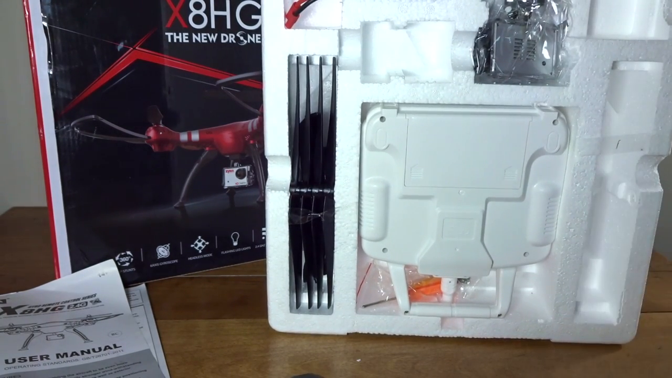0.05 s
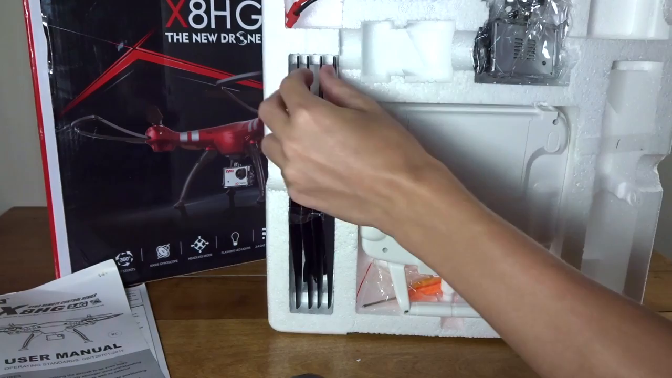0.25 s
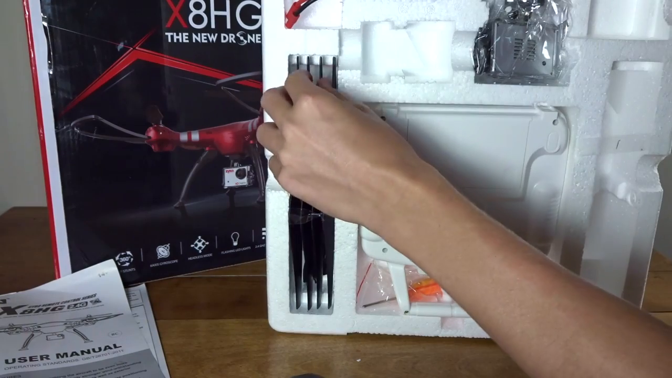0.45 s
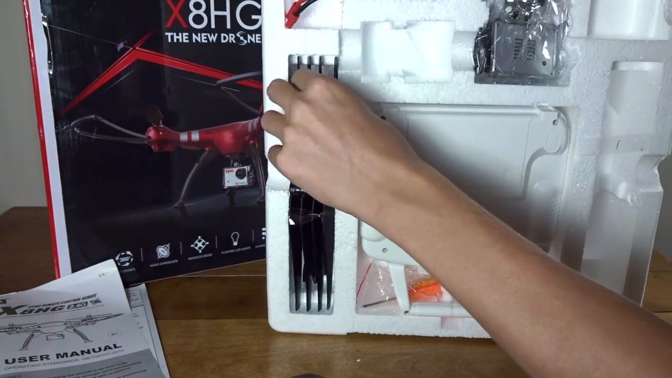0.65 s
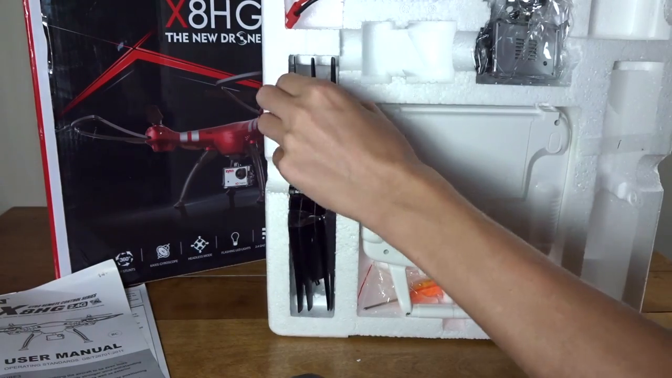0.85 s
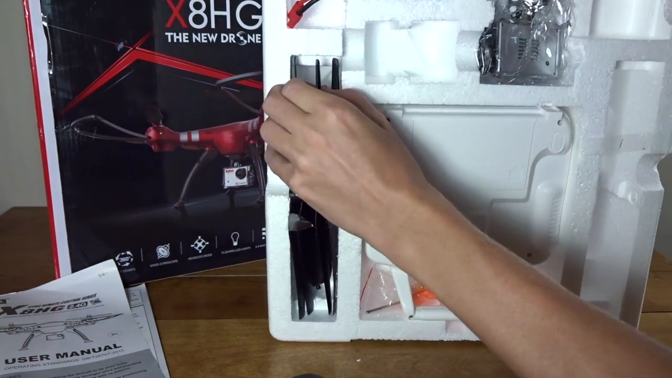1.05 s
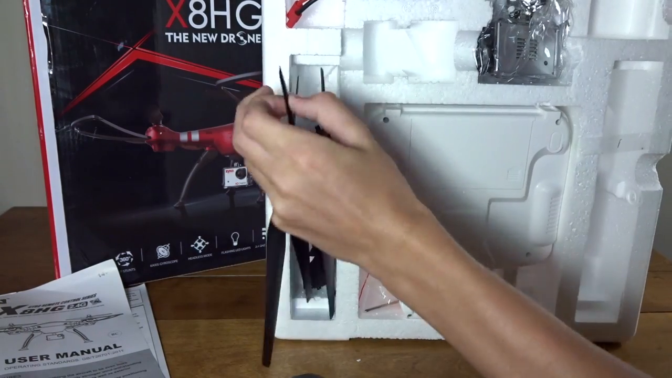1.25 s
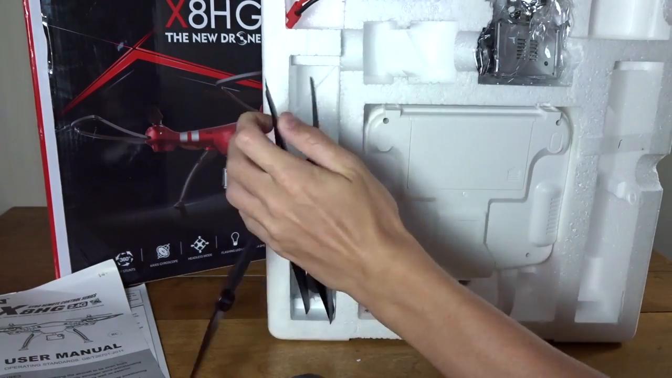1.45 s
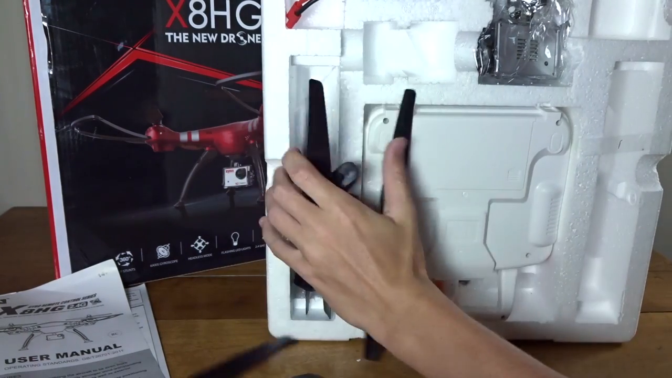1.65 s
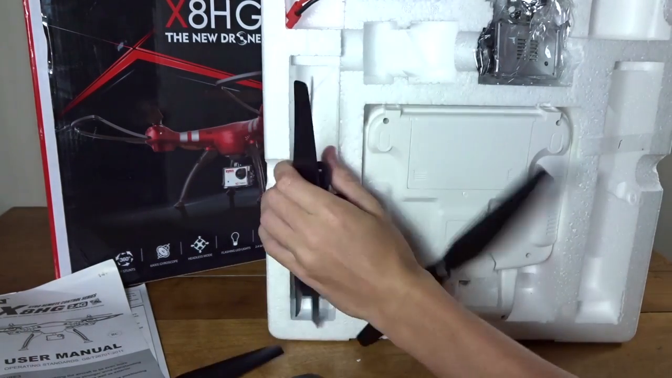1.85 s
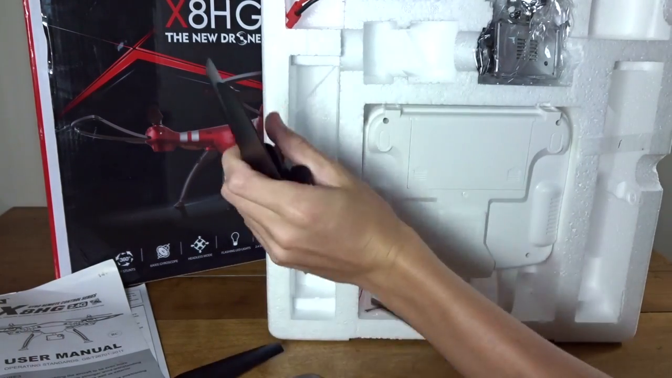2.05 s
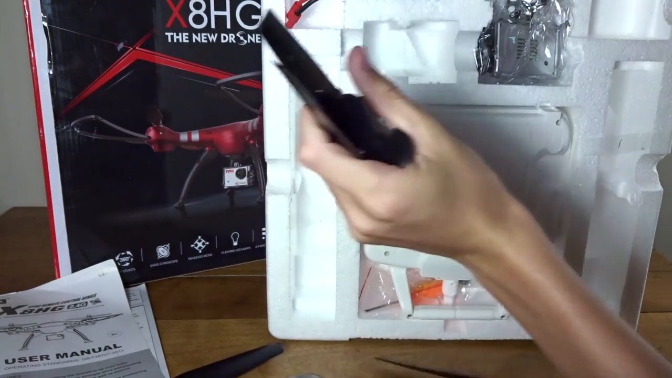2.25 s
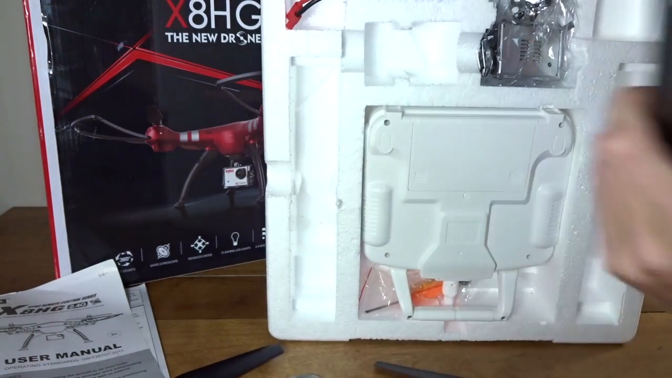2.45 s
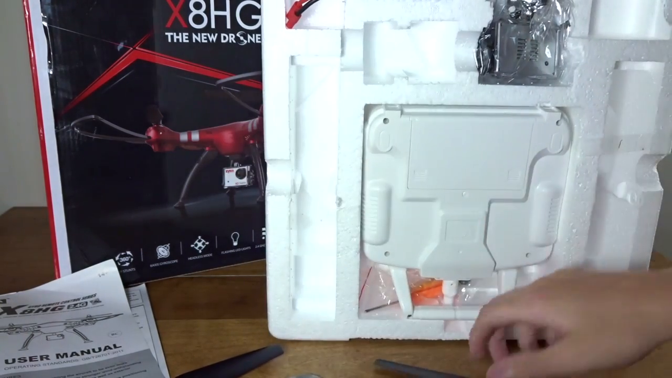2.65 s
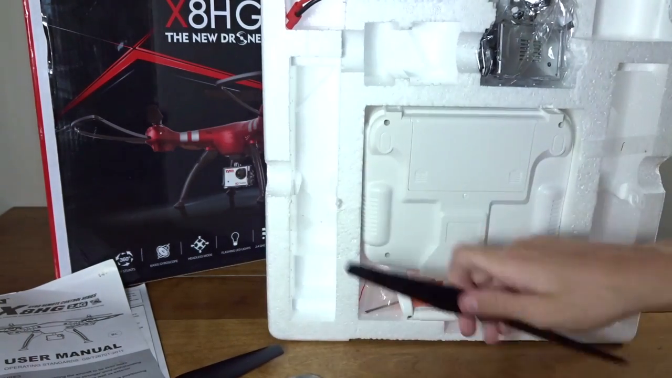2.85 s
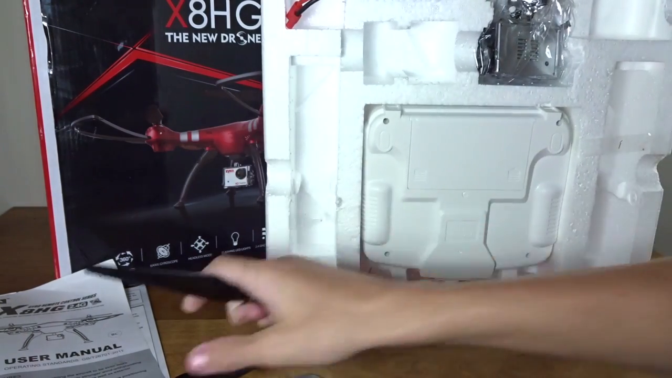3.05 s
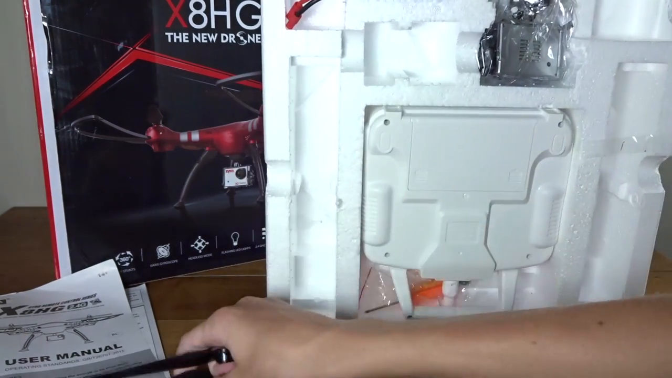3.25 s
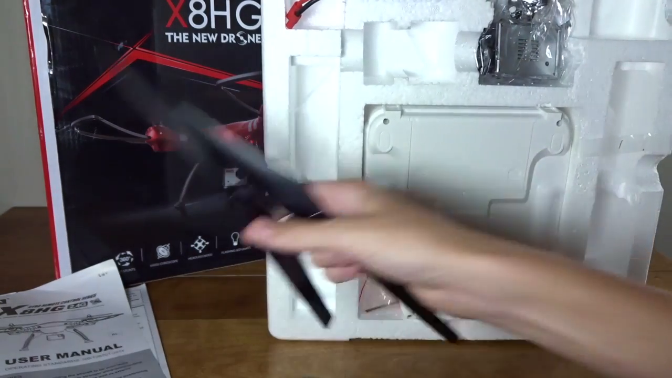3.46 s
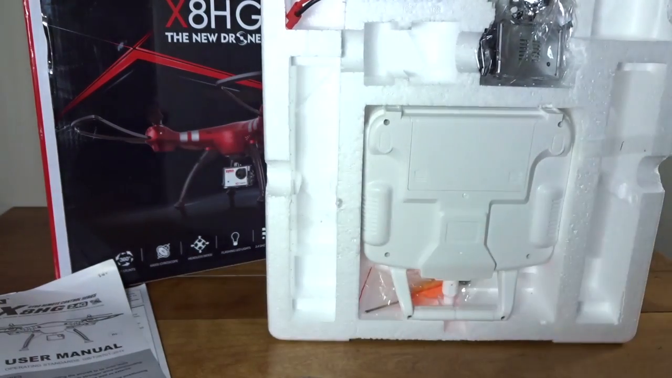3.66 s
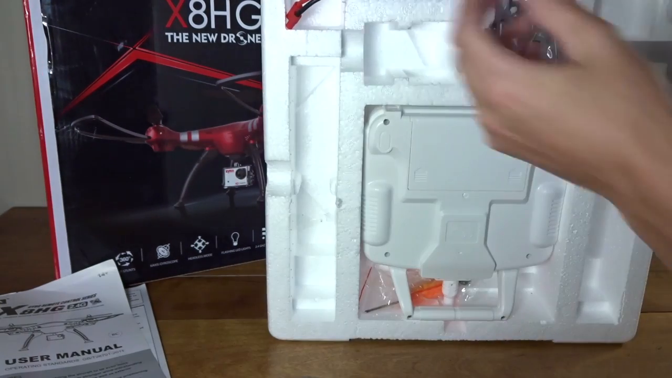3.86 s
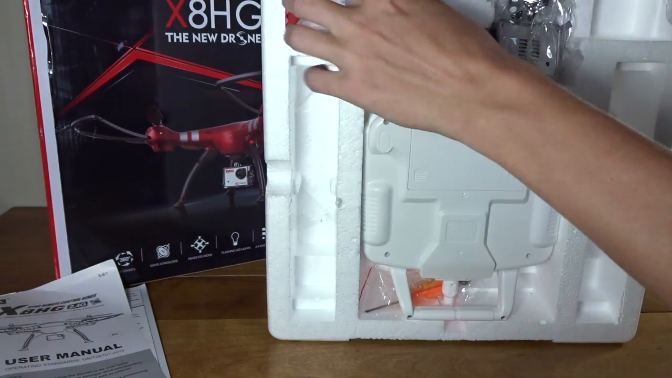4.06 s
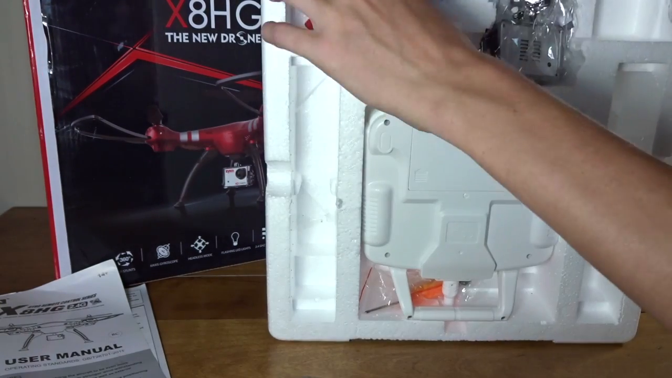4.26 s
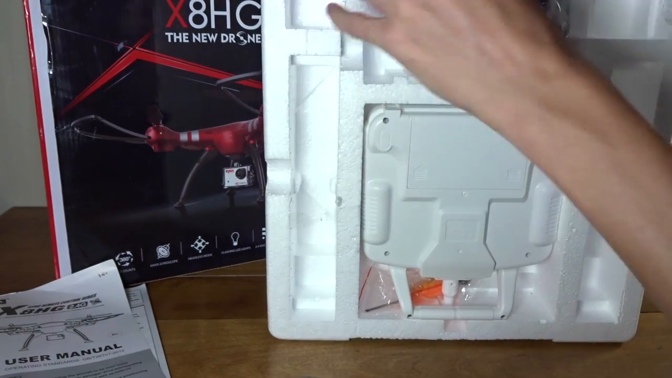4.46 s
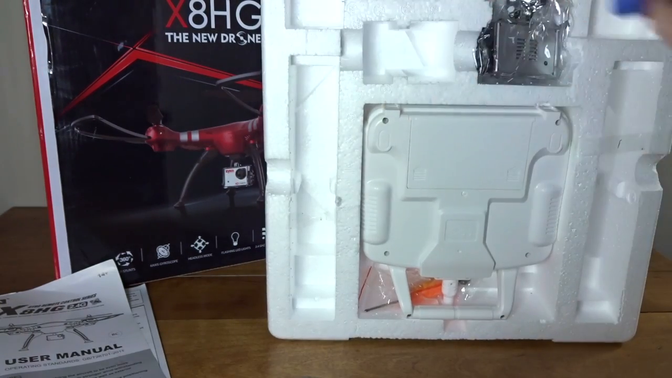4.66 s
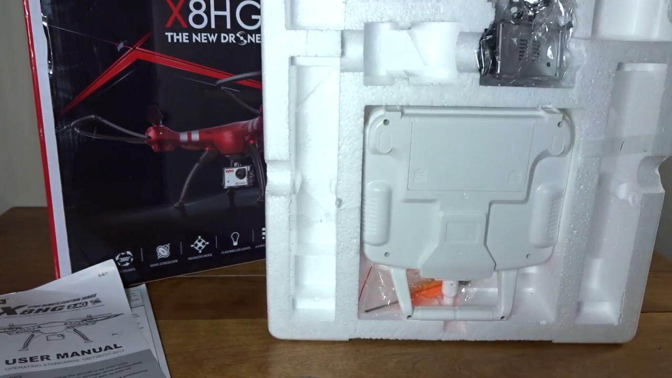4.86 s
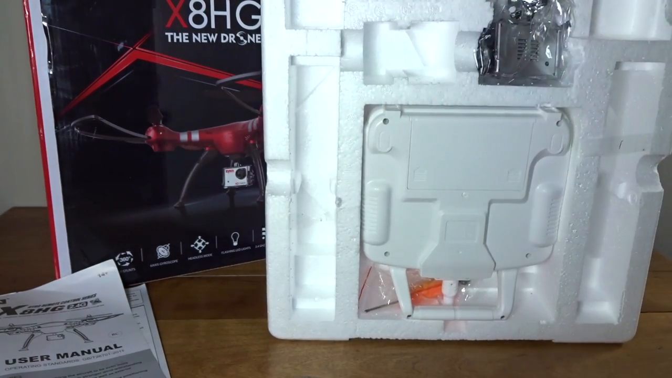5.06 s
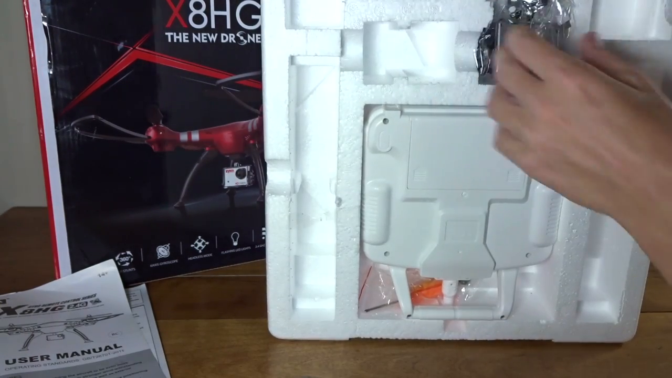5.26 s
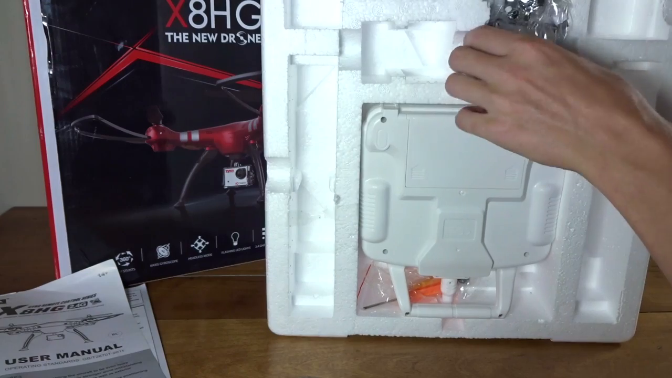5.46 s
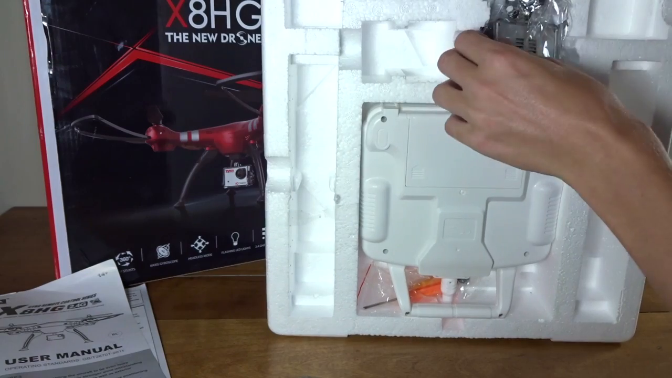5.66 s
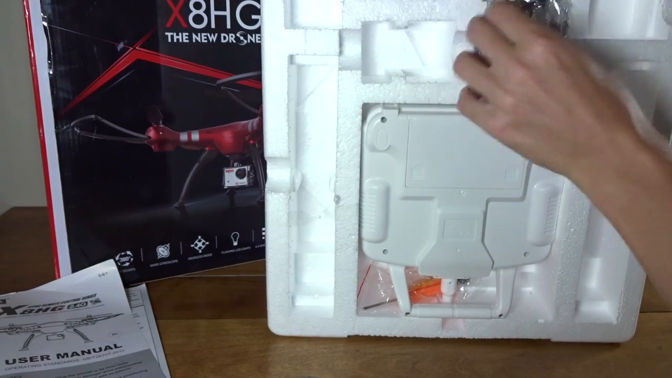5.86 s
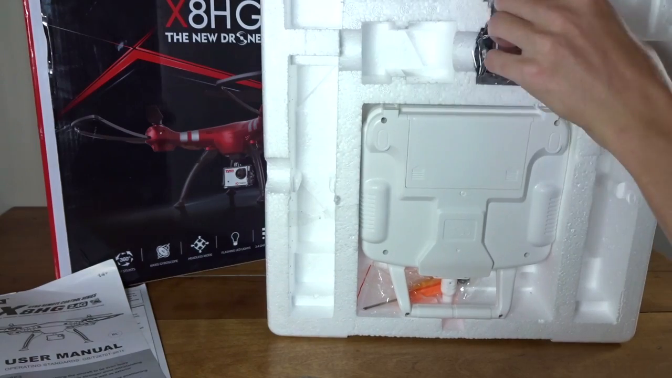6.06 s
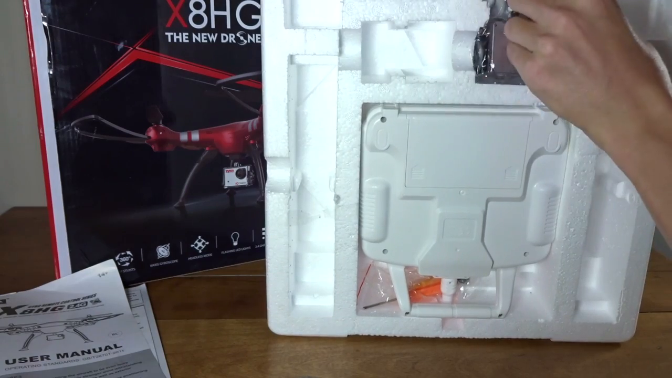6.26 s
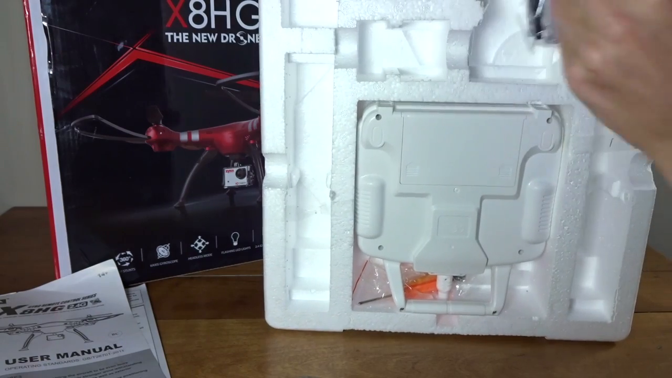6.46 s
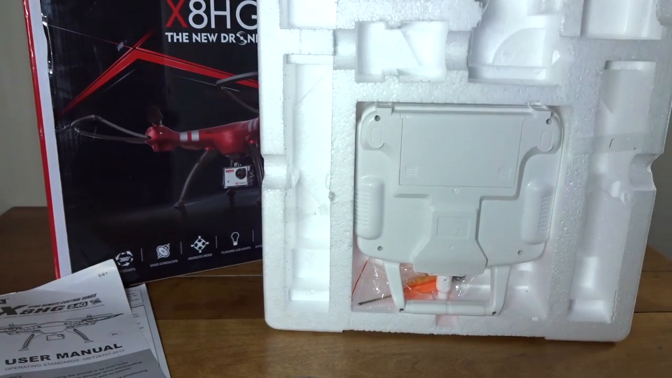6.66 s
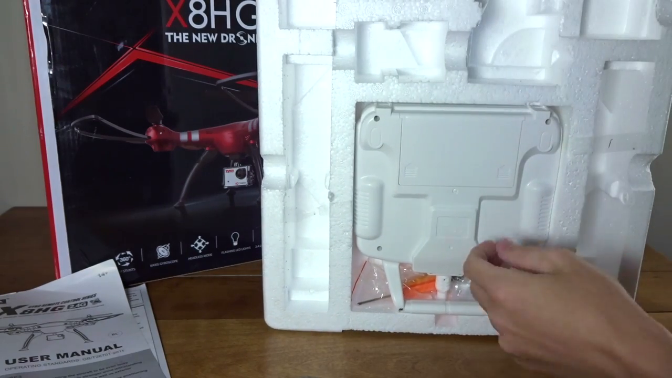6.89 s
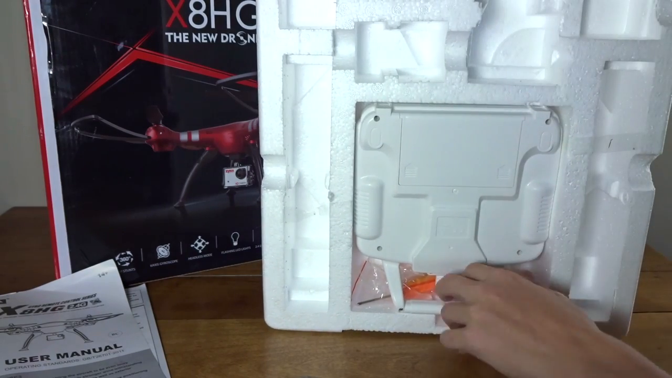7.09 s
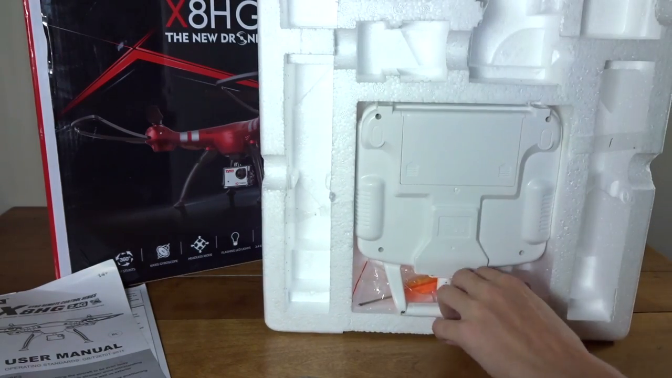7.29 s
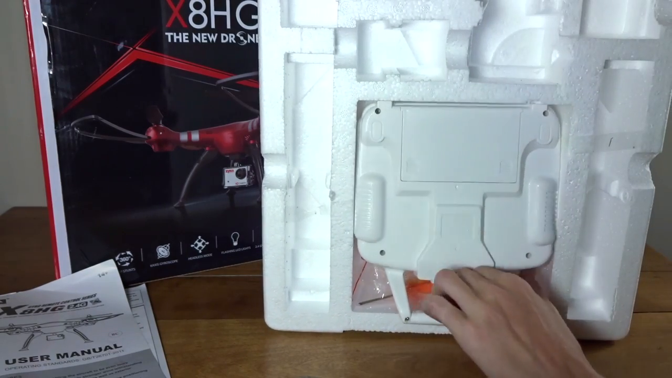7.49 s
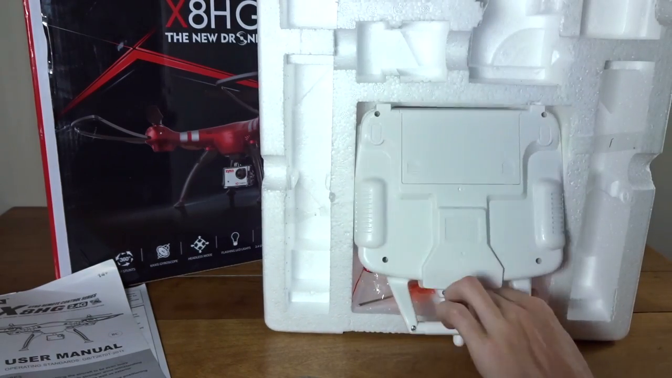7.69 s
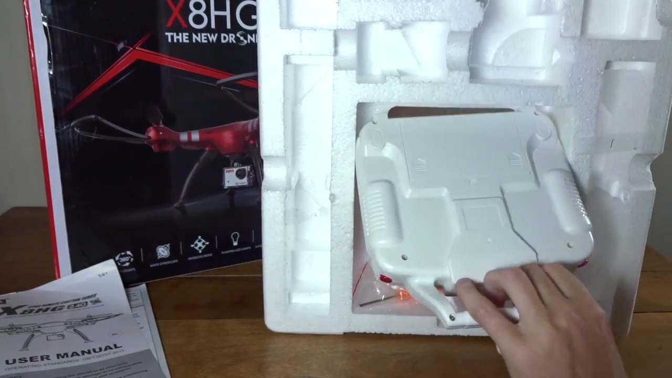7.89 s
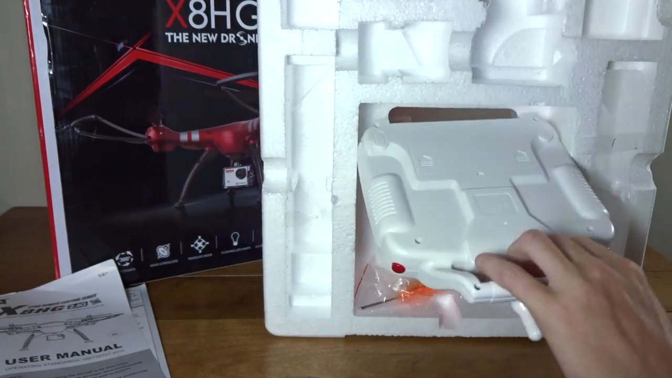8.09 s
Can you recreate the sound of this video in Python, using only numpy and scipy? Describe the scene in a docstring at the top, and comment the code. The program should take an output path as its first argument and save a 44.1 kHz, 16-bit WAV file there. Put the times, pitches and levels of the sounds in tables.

```python
"""A hand unpacks a foam tray in a small room. A small part clicks, then the foam rubs with a grainy hiss,
sticks and slips, and the hollow tray knocks. From 1.25 s plastic propellers squeak free, their blades
clacking and ringing; near 2.8 s they tap down on a wooden table. A charger slides out at 4.2 s, then a
bagged part crackles, swishes and creaks. Near 6.9 s all but a faint hiss and whine cuts out briefly,
and last a remote control scrapes out of the foam."""
import sys
import numpy as np
from scipy import signal
from scipy.fft import rfft, irfft
from scipy.io import wavfile
from scipy.ndimage import uniform_filter1d

SR = 44100
rng = np.random.default_rng(int(sys.argv[2]) if len(sys.argv) > 2 else 0)


def bounce(signal):
    """Save signal as a 16-bit WAV file at the path given by the first command-line argument."""
    frames = np.transpose(np.atleast_2d(signal))
    limited = np.clip(frames, -1, 1)
    pcm = np.round(limited * 32767).astype(np.int16)
    wavfile.write(sys.argv[1], SR, pcm)


N = 358533
TIME = np.arange(N) / SR
HZ = np.fft.rfftfreq(4096, 1 / SR)
HIT_GAIN = np.sqrt(SR / 100)  # a hit's level is its energy spread over 10 ms

# A contact has three bands: low body, mid rasp, high fizz. Body and fizz levels are relative to the rasp.
# pushes and pulls: t/s, length/s, mid-stroke rasp/dB, body/dB, fizz/dB, swell over the stroke/dB
STROKES = [(0, 0.026, -36, -13, 3.5, -13), (0.057, 0.095, -37.5, -14.5, -6, -24),
           (0.596, 0.1, -60, 16.5, 1, -12), (0.717, 0.064, -49.5, 3.5, 3, 2),
           (0.811, 0.16, -40.5, 0, 2, -10), (0.953, 0.19, -40.5, -6, 4.5, 2),
           (1.168, 0.13, -47.5, 3, 4.5, 18), (1.281, 0.069, -29.5, 2, -2.5, 6),
           (1.454, 0.42, -31.5, -0.5, -1, 3), (1.946, 0.14, -35.5, -6.5, 4.5, 0),
           (2.127, 0.3, -32.5, -4.5, 0, 4.5), (2.452, 0.044, -30.5, -6, -8.5, 8.5),
           (3.286, 0.087, -41.5, -3.5, 0, 8), (3.45, 0.86, -70, 8.5, 1, -13), (4.183, 0.08, -64, 10, 1, 13),
           (4.278, 0.062, -42.5, -4, 4.5, 0), (4.378, 0.2, -39, -13, 5, 1),
           (4.814, 0.099, -37.5, -7, 3, -6.5), (5.414, 0.019, -44.5, 1.5, -2, -9),
           (5.458, 0.16, -36, -4.5, 3.5, 14), (5.692, 0.12, -34.5, 0.5, 1.5, -1),
           (5.825, 0.082, -29.5, -12, 3, -4), (5.898, 0.1, -27, -5.5, 5, -4.5),
           (6.13, 0.065, -35, -14.5, 4, -8), (6.184, 0.054, -24.5, -9, -0.5, 1),
           (6.271, 0.26, -26, -13, 5.5, -5), (6.576, 0.11, -37.5, -15.5, 5, 3),
           (6.734, 0.12, -52.5, -5.5, 4, -30), (7.291, 0.084, -44.5, 1.5, -2, -3),
           (7.386, 0.029, -37.5, -2.5, 4.5, 5), (7.464, 0.16, -29.5, -4.5, -0.5, 16),
           (7.639, 0.13, -28.5, -2.5, -1.5, -13.5), (7.771, 0.066, -27.5, -6.5, 2.5, 1.5),
           (7.841, 0.16, -28, -5.5, 2.5, -1)]
# stuck foam lets go: t/s, length/s, rasp/dB, body/dB, fizz/dB
SLIPS = [(0.82, 0.019, -29, -1, 6), (1.282, 0.016, -28, -16, 10), (1.303, 0.031, -20, -8, 6),
         (1.491, 0.024, -20, 2, -0.5), (1.534, 0.0086, -20.5, -4, -3.5), (1.558, 0.065, -25, 6.5, -12),
         (1.65, 0.014, -26, 0.5, 3), (1.757, 0.073, -14, 2.5, -12), (1.835, 0.018, -22.5, -0.5, 5),
         (2.106, 0.045, -19, -8, 4.5), (2.284, 0.059, -17, -8, 1.5), (2.375, 0.03, -19, -5.5, 4.5),
         (3.33, 0.012, -28, -14, 1), (3.41, 0.0082, -32, -19, 4.5), (4.319, 0.01, -36, -7, 8.5),
         (4.407, 0.021, -31.5, -7, 3.5), (4.485, 0.015, -33.5, -1.5, 7), (4.876, 0.011, -24, -5, 1.5),
         (5.707, 0.029, -22.5, -13, 5.5), (5.929, 0.031, -18.5, -8, 0), (6.108, 0.037, -22, -17.5, 4),
         (6.195, 0.029, -19, -15, 0.5), (6.448, 0.036, -26, 4.5, 1), (6.515, 0.027, -26, 0, -12),
         (6.846, 0.03, -31, -7.5, -1.5)]
# a blade edge squeaks along the foam: t/s, length/s, level/dB, favoured f/Hz, spread/octaves
SQUEAKS = [(1.555,0.046,-10,2000,1.25), (1.701,.014,-23,3550,.45), (1.755,.045,-14,3000,1.6),
           (1.843,0.016,-17.5,5200,0.35)]
# bumps on the hollow tray or the table: t/s, rasp/dB, body/dB, ring f/Hz
KNOCKS = [(0.353,-63,11,640), (0.591,-51,11.5,487), (0.617,-51.5,13,1300), (0.702,-50.5,16,646),
          (0.712,-41,13,1120), (0.832,-42.5,13,695), (0.89,-43.5,10,1210), (0.943,-42,8,1115),
          (1.146,-38,5,1230), (1.291,-27.5,8,628), (1.473,-41,6,1100), (1.558,-25,5,1260),
          (1.753,-24.5,2,840), (1.775,-35,8,420), (2.028,-40.5,12.5,868), (2.831,-60,12.5,410),
          (2.832,-58,15,197), (2.848,-48.5,6,1060), (3.338,-40.5,7,1300), (3.378,-46,4.5,484),
          (3.479,-54.5,15,468), (4.397,-42,9.5,666), (4.583,-39.5,2.5,1146), (4.881,-36,4.5,1220),
          (5.712,-31,6,880), (5.741,-27.5,9.5,800), (5.8,-26,5.5,976), (5.909,-40,11,930),
          (6.228,-33.5,8,1126), (7.419,-35.5,5,1156), (7.532,-48,10.5,264), (7.808,-34.5,7,1080),
          (7.917,-34.5,9.5,1025)]
# propeller blades clack: t/s, rasp/dB, body/dB, fizz/dB, ring f/Hz, ring level/dB
CLACKS = [(1.438,-31.5,-8,1,4000,-37), (1.703,-17.5,-5.5,-3,4320,-24.5), (1.811,-17.5,-7,-4,5390,-20),
          (2.047,-29,-6.5,-10,3900,-26), (2.1,-18,-8,0,5300,-32), (2.119,-22.5,-10.5,8,5300,-26),
          (2.182,-24.5,-22,3,3830,-30), (2.204,-31,-22,12.5,5780,-20), (2.259,-21,-14,4.5,5800,-38),
          (2.47,-24,-22,5.5,5800,-27)]
# dry clicks of small parts, blade tips and plastic film: t/s, rasp/dB, body/dB, fizz/dB
SNAPS = [(0.055,-19,-20,-11), (0.063,-21,-35,-8), (0.203,-44,-9,-7), (1.284,-34,-11,10.5),
         (2.562,-39.5,6,-6), (2.847,-30,-12,3.5), (2.859,-37,0,0), (2.908,-30.5,-12.5,1.5),
         (3.105,-42,-17.5,-1.5), (3.304,-37,-11,7.5), (3.363,-26.5,-8,6.5), (4.855,-29,-0.5,5),
         (5.611,-24.5,-30,3.5), (5.993,-21,-9.5,4), (6.116,-36,-14,13), (6.204,-25,-10,-6),
         (6.275,-23,-4,4.5), (6.351,-20,-6.5,-4), (6.499,-24.5,-28,2), (6.523,-22,-12,-1.5),
         (7.181,-51.5,3,-3), (7.366,-47,-11,8)]
# smooth plastic slides: t/s, length/s, first f/Hz, last f/Hz, level/dB
SWISHES = [(2.365, 0.02, 13800, 12000, -28), (3.123, 0.075, 13000, 13600, -50),
           (6.106, 0.034, 13200, 13000, -21), (6.308, 0.19, 13200, 9900, -25)]
# the course of the bag's creak: t/s, level/dB, slip rate/Hz
CREAK = [(6.619, -51, 147), (6.699, -29.5, 123), (6.75, -54, 63), (6.811, -37, 85), (6.873, -49, 95)]
# a rubbed blade sings: t/s, length/s, f/Hz, level/dB
SINGS = [(2.427,0.09,1557,-35)]
# modes of a free blade: ratio to its ring pitch, level/dB, t60/s
BLADE_MODES = [(.84, -18.5, 0.043), (0.919, -14.5, 0.19), (0.997, -2, 0.04), (2.109, -17.5, 0.031)]
# modes of a propeller wedged in the tray: f/Hz, width/Hz, level/dB
WEDGED_MODES = [(1060,60,7.5), (1375,100,6.5), (1880,150,3.5), (2700,170,3), (3500,89,5.5), (3970,130,0),
                (5240,95,0.5), (5820,50,4)]
# tone colour of each thing handled: f/Hz, level/dB
PART = [(100, -105), (500, -34.5), (1300, -31.5), (1600, -20), (5500, 2), (7400, 3), (8300, -3),
        (15500, -9)]
TRAY = [(90, -50), (232, -18), (350, -13.5), (515, -14.5), (682, -7), (883, -11), (1250, -10.5),
        (1550, -12), (2090, -10.5), (3580, -10.5), (15500, -8)]
PROPELLERS = [(90, -45), (242, -15), (314, -15.5), (473, -8), (515, -10), (612, -8.5), (963, -2),
              (1070, -2.5), (1690, -6), (1840, -3.5), (15500, -10.5)]
BUNDLE = [(90, -35), (191, -9.5), (612, -2.5), (727, 7.5), (1050, -5.5), (2480, -1.5), (5630, 1),
          (7140, -2), (15500, -2)]
TABLE = [(90, -33.5), (350, -12), (473, -11.5), (743, -14), (1300, -16.5), (1450, -9), (5750, 11.5),
         (15500, 9.5)]
CHARGER = [(90, -24), (230, 2), (600, 3.5), (1300, 8.5), (3000, 9.5), (15500, 12)]
BAG = [(90, -38), (220, -17.5), (520, -12), (680, -6), (1700, -5.5), (2200, 5), (6500, 9), (12800, 4.5),
       (15500, 3.5)]
REMOTE = [(90, -41), (237, -13), (314, -14), (483, -3), (562, -10), (846, 3.5), (1150, 2), (1620, -0.5),
          (2900, -0.5), (6140, -0.5), (15500, -5.5)]
# peaks and dips that shape each tone colour: f/Hz, width/Hz, level/dB
PART_PEAKS = [(3020, 800, 16.5), (3730, 470, -5.5), (4300, 450, 7), (5100, 480, 11.5)]
FOAM_PEAKS = [(241, 21, 8), (545, 53, -2.5), (614, 57, 6), (1090, 110, -0.5), (1310, 150, 4),
              (1540, 680, -7.5)]
BLADE_PEAKS = [(295, 88, 7), (471, 47, 6.5), (611, 57, 9), (740, 39, -20), (1080, 260, 9.5),
               (2020, 42, 9.5), (5350, 180, 5), (5900, 150, 4)]
WOOD_PEAKS = [(470, 34, 11.7), (1090, 35, 13), (1315, 83, 7.6), (5730, 47, 5.9)]
BAG_PEAKS = [(1240, 130, 1.9)]
# what is in the hand: start t/s, colour, peaks and dips, friction graininess/dB
HANDLED = [(0, PART, PART_PEAKS, -1), (.3, TRAY, FOAM_PEAKS, -2.5), (1.25, PROPELLERS, FOAM_PEAKS, 2.5),
           (2.06, BUNDLE, BLADE_PEAKS, 3.5), (2.82, TABLE, WOOD_PEAKS, 1.5),
           (4.22, CHARGER, FOAM_PEAKS, 0.5), (5.2, BAG, BAG_PEAKS, 2.5), (7.05, REMOTE, FOAM_PEAKS, 0.5)]
# decay of the room: f/Hz, t60/s
ROOM_DECAY = [(150, 0.37), (500, 0.46), (1400, 0.35), (4000, 0.29), (9000, 0.3), (15000, 0.025)]
# side-channel EQ of the reverb and of the hiss: f/Hz, level/dB
REVERB_WIDTH = [(50, 11), (150, -6), (500, 1.5), (1100, 6), (2500, -0.5), (14000, -64)]
HISS_WIDTH = [(60, 5.5), (180, 0), (550, 6), (1650, 9), (4970, -6.5), (15000, -34)]
# colour of the background hiss: f/Hz, level/dB
HISS = [(18, -81), (30, -44), (369, -9), (747, -8), (6050, -17), (15500, -22)]


def rubbing(objects):
    """Sliding friction drives whichever object is in hand; the grip wavers in each band."""
    judder_db = 0.26 * wander(130)
    patchy_db = np.array([-1.0 * wander(70), 1.07 * wander(60), 1.07 * wander(50)])
    level = np.sqrt(stroke_power()) * amp(judder_db + patchy_db)
    starts = [0] + [round(row[0] * SR) for row in HANDLED[1:]] + [N]
    out = np.zeros(N)
    for start, end, held, (*_, grain_db) in zip(starts, starts[1:], objects, HANDLED):
        force = grains(end - start, 11000, grain_db) * level[:, start:end]
        add(out, start / SR, signal.fftconvolve(force, held, axes=1).sum(0))
    return out


def stroke_power(grip_s=0.019, release_db_per_s=183):
    """Rubbing power in three bands: each stroke grips, swells or slackens, and dies as the hand slows."""
    power, t = np.zeros((3, N)), np.arange(SR) / SR
    for s, length, rasp_db, body_db, fizz_db, swell_db in STROKES:
        ramp_db = swell_db * (np.minimum(t / length, 1) - .5)
        release_db = release_db_per_s * np.maximum(t - length, 0)
        stroke = np.minimum(t / grip_s, 1) * amp(rasp_db + ramp_db - release_db)
        for band, band_db in zip(power, (body_db, 0, fizz_db)):
            add(band, s, (amp(band_db) * stroke) ** 2)
    return power


def grains(count, per_s, grain_db):
    """Foam beads catch and let go: dense tiny slips, a few of them large."""
    size = amp(grain_db * np.minimum(rng.exponential(1, count), 3.6))
    return np.sqrt(count) * unit(size * rng.standard_normal(count) * (rng.random(count) < per_s / SR))


def slips(objects, rise_s=0.0013, release_s=0.0064, sag=0.25):
    """Stuck foam lets go in a run of grains that slackens, then catches again."""
    out, t = np.zeros(N), np.arange(SR // 8) / SR
    for s, length, *levels in SLIPS:
        attack = 1 - np.exp(-t / rise_s)
        speed = attack * np.exp(-sag * t / length - np.maximum(t - length, 0) / release_s)
        add(out, s, strike(objects, s, speed * grains(len(t), 8000, grain_db=0), *levels))
    return out


def travelling_contact(friction, fine_db=2.5, broad_db=1.5):
    """As the contact point travels, narrow and broad resonances come and go."""
    spectra = signal.stft(friction, SR, nperseg=512)[2]
    for db, bins, frames in ((fine_db, 3, 9), (broad_db, 14, 5)):
        patches = uniform_filter1d(rng.standard_normal(spectra.shape), bins, axis=0)
        patches = uniform_filter1d(patches, frames, axis=1)
        spectra = spectra * amp(db * np.sqrt(bins * frames) * patches)
    return signal.istft(spectra, SR, nperseg=512)[1][:N]


def squeaks(slips_per_s=520, release_s=0.011, sag=0.7, uneven=0.45):
    """Slowing stick-slip drives a wedged propeller; the contact point favours some of its modes."""
    out, t = np.zeros(N), np.arange(SR // 8) / SR
    hz, width, db = np.transpose(WEDGED_MODES)[:, :, None]
    for s, length, level_db, favoured_hz, spread in SQUEAKS:
        speed = np.exp(-sag * t / length - np.maximum(t - length, 0) / release_s)
        turns = np.cumsum(slips_per_s * np.sqrt(speed) * np.exp(uneven * wander(400)[:len(t)])) / SR
        pulses = np.diff(np.floor(turns), prepend=-1)
        force = unit(pulses) + .5 * unit(rng.standard_normal(len(t)))
        weight = amp(db) * width * np.exp(-.5 * (np.log2(hz / favoured_hz) / spread) ** 2)
        modes = (weight * np.exp(-np.pi * width * t) * np.cos(2 * np.pi * hz * t)).sum(0)
        modes[0] /= 2  # a half step at the start keeps the bass out
        add(out, s, HIT_GAIN * amp(level_db) * unit(signal.fftconvolve(force * speed, modes)))
    return out


def knocks(objects, thud_db=-2.5, pop_db=-0.5):
    """Soft bumps on the hollow tray and the table: a dull thud layered with a pitched pop."""
    out = np.zeros(N)
    for s, rasp_db, body_db, ring_hz in KNOCKS:
        force = impact(chatter=3.9, chatter_s=0.0064)
        add(out, s, strike(objects, s, force, rasp_db, body_db + thud_db, fizz_db=-1.5))
        add(out, s, hollow_pop(ring_hz, rasp_db + body_db + pop_db))
    return out


def hollow_pop(hz, db, t60_cycles=40):
    """A bumped spot rings briefly at its own pitch."""
    cycles = hz * np.arange(SR // 5) / SR
    envelope = (1 - np.exp(-cycles)) * amp(-60 * cycles / t60_cycles)
    return HIT_GAIN * amp(db) * unit(envelope * np.sin(2 * np.pi * cycles))


def clacks(objects):
    """Propeller blades clack against each other and ring on."""
    out = np.zeros(N)
    for s, *levels, ring_hz, ring_db in CLACKS:
        add(out, s, strike(objects, s, impact(chatter=10.0, chatter_s=0.0083), *levels))
        add(out, s, blade_ring(ring_hz, ring_db))
    return out


def blade_ring(hz, db):
    """The dying modes of a struck blade."""
    t = np.arange(SR // 5) / SR
    tone = sum(rng.choice([-1, 1]) * amp(level - 60 * t / t60) * np.sin(2 * np.pi * hz * ratio * t)
               for ratio, level, t60 in BLADE_MODES)
    onset = 1 - np.exp(-(t * hz / 2) ** 2)  # builds over two cycles
    return HIT_GAIN * amp(db) * unit(onset * tone)


def snaps(objects):
    """Tight clicks from short contacts that leave no ring of their own."""
    out = np.zeros(N)
    for s, *levels in SNAPS:
        add(out, s, strike(objects, s, impact(chatter=3.5, chatter_s=0.004), *levels))
    return out


def swishes(width_hz=2400, grain_db=5.0):
    """Sliding plastic: fine grains swell and fade through one broad, gliding resonance."""
    out, t = np.zeros(N), np.arange(SR // 4) / SR
    pole = np.exp(-np.pi * width_hz / SR)
    for s, length, first_hz, last_hz, db in SWISHES:
        travel = np.minimum(t / length, 1)
        glide = np.exp(2j * np.pi * np.cumsum(first_hz + (last_hz - first_hz) * travel) / SR)
        force = grains(len(t), 9000, grain_db) * np.sqrt(abs(np.sin(np.pi * travel)))
        hiss = (glide * signal.lfilter([1], [1, -2 * pole, pole * pole], force / glide)).real
        add(out, s, amp(db) * np.sqrt(length * SR) * unit(hiss))
    return out


def bag_creak(objects, uneven=0.23):
    """The bag comes free in an uneven train of single slips."""
    s, db, per_s = np.transpose(CREAK)
    t = np.arange(s[0], s[-1], 1 / SR)
    turns = np.cumsum(np.interp(t, s, per_s) * np.exp(uneven * wander(60)[:len(t)])) / SR
    out = np.zeros(N)
    for at in t[1:][np.diff(np.floor(turns)) > 0]:
        force = impact(chatter=1.73, chatter_s=0.0025)
        add(out, at, strike(objects, at, force, np.interp(at, s, db), body_db=-40, fizz_db=-0.86))
    return out


def singing_blade(rise_s=0.0049, release_s=0.019, waver=0.7):
    """One mode of a rubbed blade builds, holds unsteadily and dies."""
    out, t = np.zeros(N), np.arange(SR // 2) / SR
    for s, length, hz, db in SINGS:
        level = amp(db) * (1 - np.exp(-t / rise_s)) * np.exp(-np.maximum(t - length, 0) / release_s)
        grip = 1 + waver * (wander(69) + 1j * wander(77))[:len(t)]
        add(out, s, np.sqrt(2) * level * (grip * np.exp(2j * np.pi * hz * t)).real)
    return out


def impact(chatter, chatter_s):
    """The force of a hit: one impulse, then the surfaces chatter against each other."""
    t = np.arange(SR // 20) / SR
    force = chatter * unit(grains(len(t), 9000, grain_db=0.8) * np.exp(-t / chatter_s))
    force[0] += rng.choice([-1, 1])
    return force


def strike(objects, s, force, rasp_db, body_db, fizz_db):
    """A short force excites the three bands of the object in hand at time s."""
    held = objects[max(sum(s >= row[0] for row in HANDLED) - 1, 0)]
    bands = unit(signal.fftconvolve(force[None], held, axes=1))
    return HIT_GAIN * amp(rasp_db + np.array([body_db, 0, fizz_db])) @ bands


def tap_responses(colour, peaks, body_hz=1450, fizz_hz=6600, lowest_hz=90):
    """How one object answers a tap: its body, rasp and fizz, each of energy 1."""
    peaks_db = sum(db / (1 + (2 * (HZ - f) / width) ** 2) for f, width, db in peaks)
    bass_cut = np.minimum(HZ / lowest_hz, 1) ** 2  # a shared low cut thins the bass below 90 Hz
    shape = amp(-60) + amp(curve(colour, HZ) + peaks_db) * bass_cut
    low, high = 1 / (1 + (HZ / body_hz) ** 10), 1 - 1 / (1 + (HZ / fizz_hz) ** 8)
    log_gain = np.log(shape * np.sqrt([low, (1 - low) * (1 - high), high]) + 1e-5)
    mirrored = np.concatenate([log_gain, log_gain[:, -2:0:-1]], axis=1)
    minimum_phase = np.exp(np.conj(signal.hilbert(mirrored)))  # keeps the attack sharp
    return unit(np.fft.ifft(minimum_phase).real)


def reverb(sound, build_s=0.0025):
    """The small room: a fresh pattern of sparse reflections, each band dying at its own speed."""
    count = SR // 2
    onset = 1 - np.exp(-(np.arange(count) / SR / build_s) ** 2)
    taps = rng.standard_normal(count) * (rng.random(count) < 5000 / SR) * onset
    hz, t, spectra = signal.stft(taps, SR, nperseg=256)
    t60 = curve(ROOM_DECAY, hz)[:, None]
    tail = signal.istft(spectra * amp(-60 * t / t60) / np.sqrt(t60), SR, nperseg=256)[1]
    return signal.fftconvolve(sound, unit(tail))[:N]


def noise_bed(hiss_db=-61.5, whine_hz=15800, whine_db=-72):
    """Steady faint hiss with a thin electrical whine."""
    hiss = np.sqrt(N) * unit(equalise(rng.standard_normal(N), HISS))
    whine = np.sqrt(2) * np.sin(2 * np.pi * whine_hz * TIME)
    return amp(hiss_db) * hiss + amp(whine_db) * whine


def amp(db):
    """Decibels to gain."""
    return 10 ** (np.asarray(db) / 20)


def unit(x):
    """Scales each row to energy 1."""
    return x / np.sqrt(np.sum(x ** 2, -1, keepdims=True) + 1e-20)


def curve(points, hz):
    """Joins breakpoints on a log-frequency axis."""
    f, value = np.transpose(points)
    return np.interp(np.log(hz + 1), np.log(f + 1), value)


def equalise(x, points):
    """Filters x by an EQ curve in dB."""
    return irfft(rfft(x) * amp(curve(points, np.fft.rfftfreq(len(x), 1 / SR))), len(x))


def wander(per_s):
    """A random modulator of about unit size."""
    knots = rng.standard_normal(N // 20)
    return np.interp(TIME * per_s, np.arange(len(knots)), knots)


def add(mix, s, sound):
    """Mixes a sound in at time s."""
    part = mix[max(round(s * SR), 0):][:len(sound)]
    part += sound[:len(part)]


def scene(sway=0.0082, blend_period_s=1.714, stop_s=6.887, resume_s=7.15):
    """All contacts, near the middle of a small room; they sway a little to either side."""
    objects = [tap_responses(colour, peaks) for _, colour, peaks, _ in HANDLED]
    friction = travelling_contact(rubbing(objects) + slips(objects)) + squeaks() + singing_blade()
    dry = friction + knocks(objects) + clacks(objects) + snaps(objects) + bag_creak(objects) + swishes()
    # the hand moves, so the reflections blend between three patterns
    place = TIME * 2 * np.pi / blend_period_s
    wet = sum(reverb(dry * np.sqrt(2 / 3) * np.cos(place + k * np.pi / 3)) for k in range(3))
    mid = amp(-1.5) * dry + amp(-9.0) * wet
    side = amp(-25.5) * equalise(reverb(dry), REVERB_WIDTH) + sway * wander(9) * mid
    # all sound but the faint hiss drops out for a moment, reverb and all
    gate = uniform_filter1d(1. * ((TIME < stop_s) | (TIME > resume_s)), size=300)
    mid = gate * mid + noise_bed()
    side = gate * side + amp(0.5) * equalise(noise_bed(), HISS_WIDTH)
    return np.array([mid + side, mid - side]) * amp([[-.15], [.15]])


def record(dry):
    """A steep low-pass trims the air above 15.85 kHz."""
    low_pass = signal.firwin(511, 15850, window=("kaiser", 8), fs=SR)
    return signal.oaconvolve(dry, low_pass[None], "same")


dry = scene()
out = record(dry)
bounce(out)
```